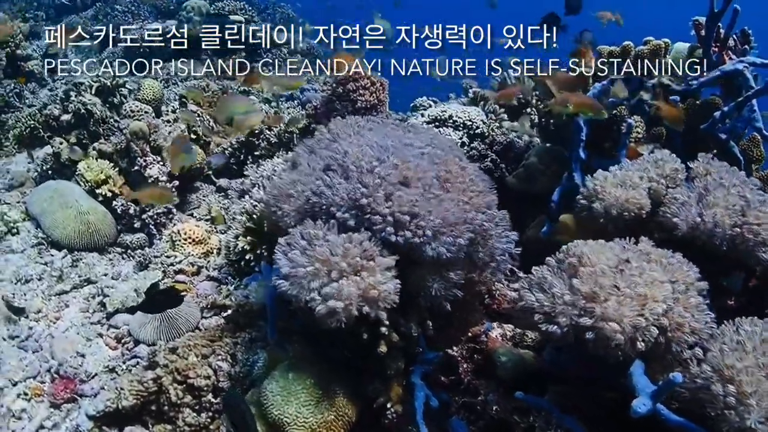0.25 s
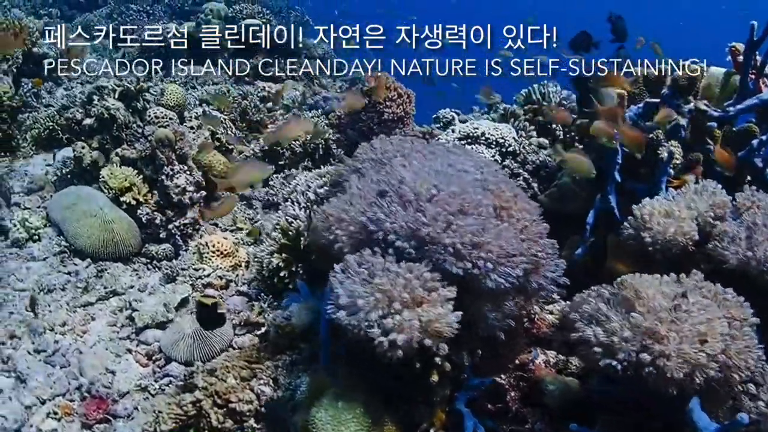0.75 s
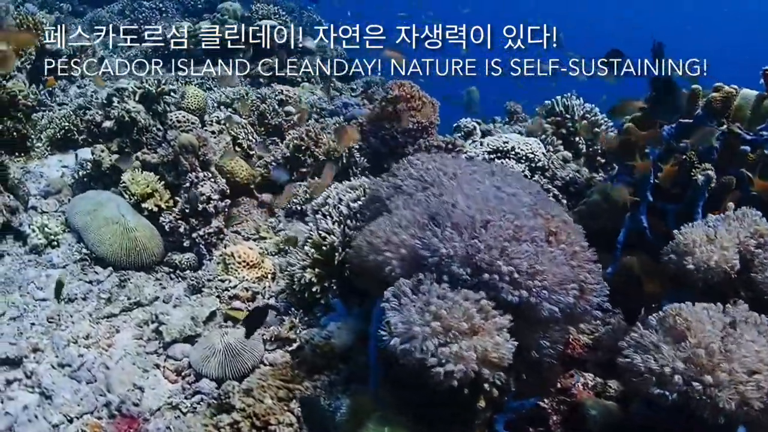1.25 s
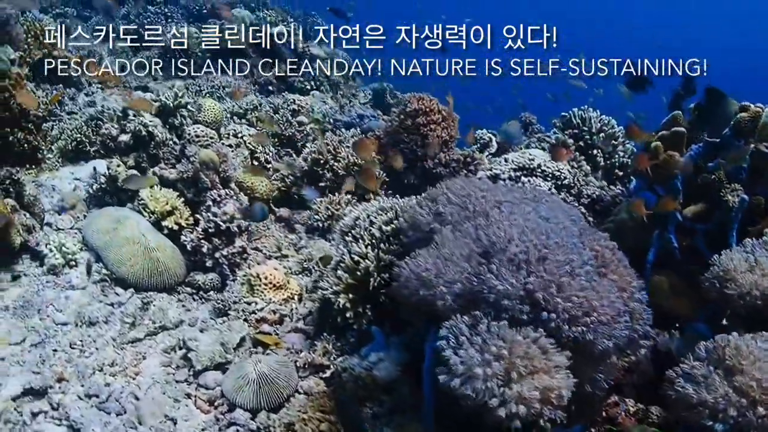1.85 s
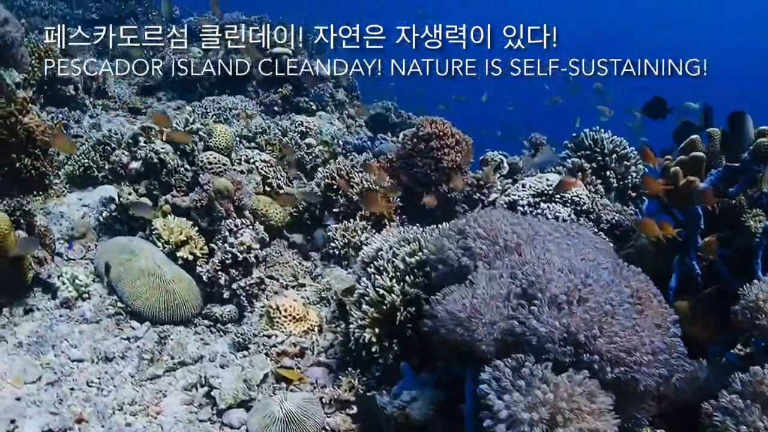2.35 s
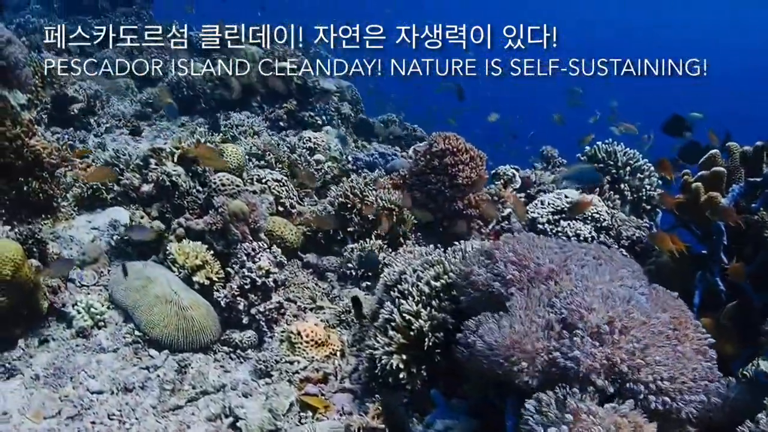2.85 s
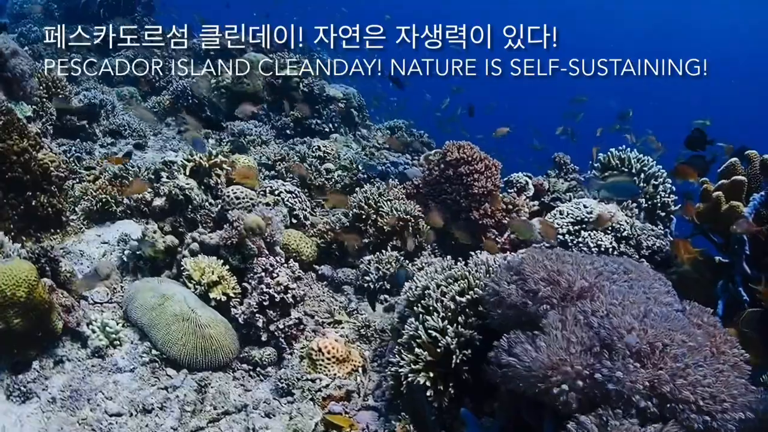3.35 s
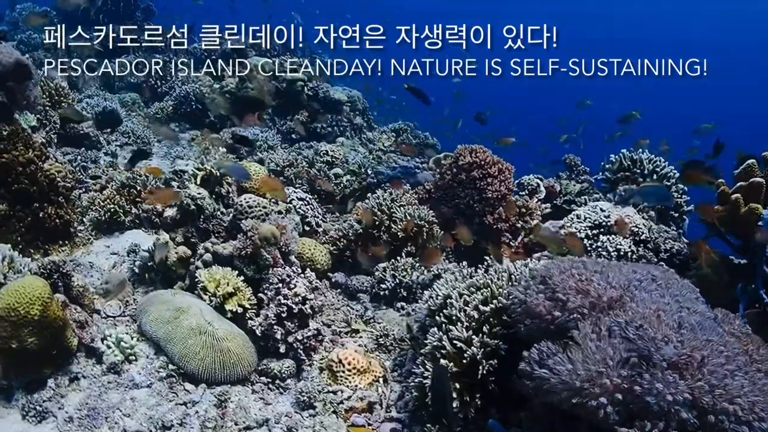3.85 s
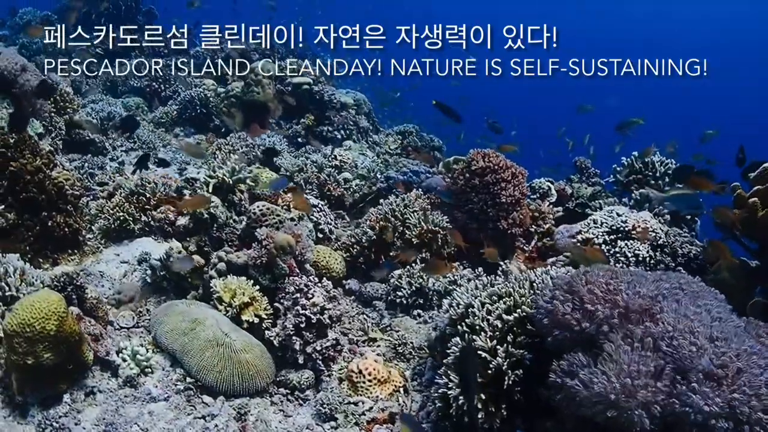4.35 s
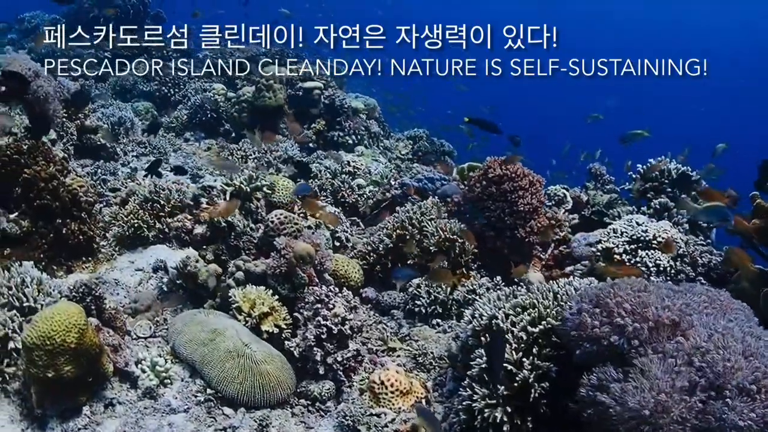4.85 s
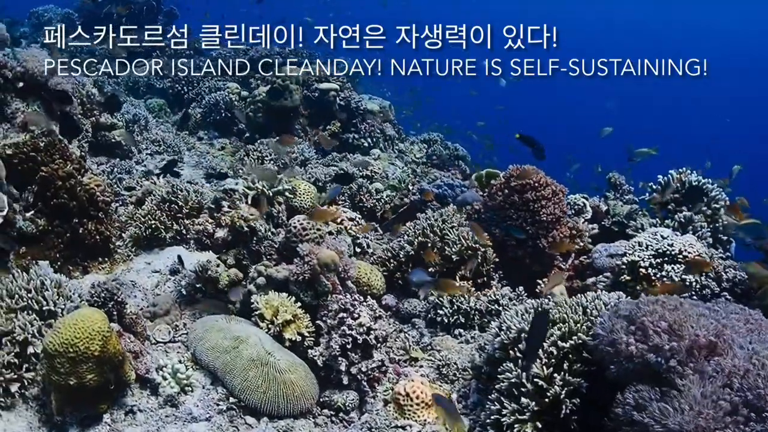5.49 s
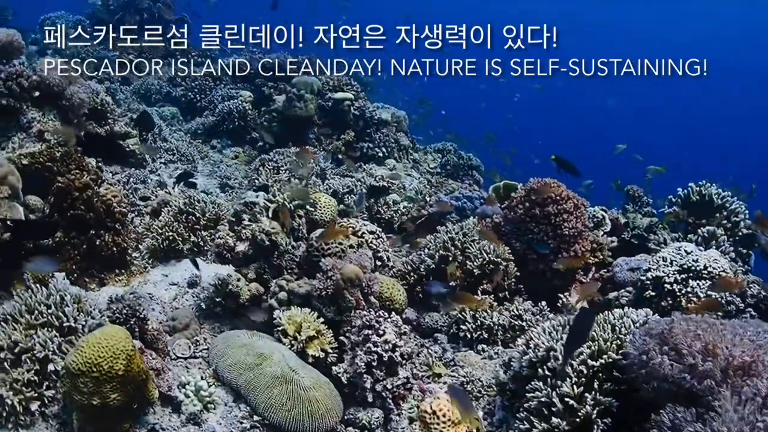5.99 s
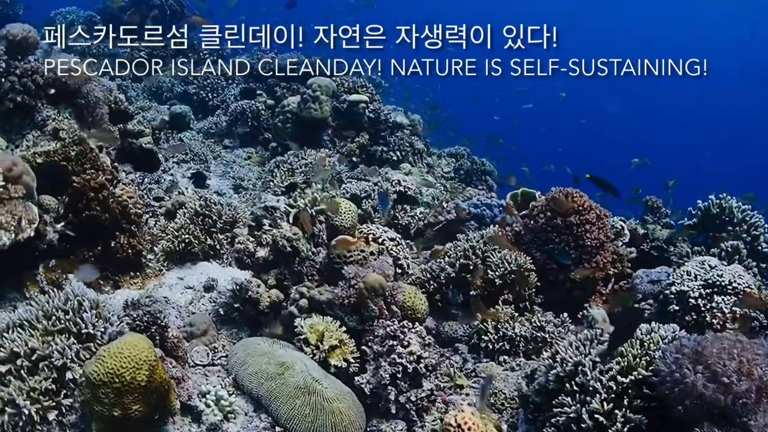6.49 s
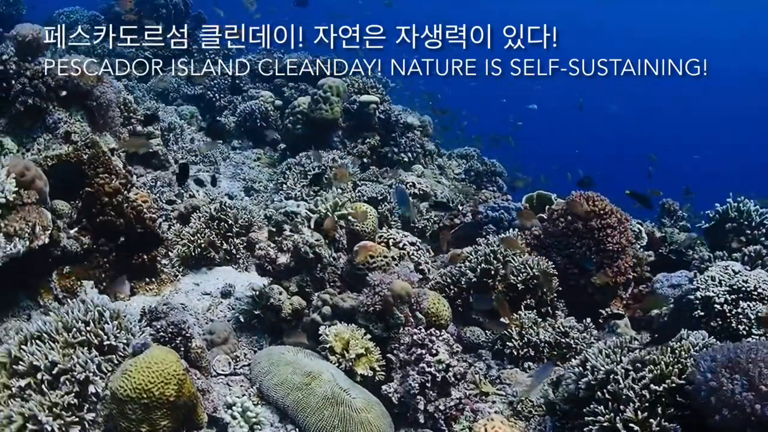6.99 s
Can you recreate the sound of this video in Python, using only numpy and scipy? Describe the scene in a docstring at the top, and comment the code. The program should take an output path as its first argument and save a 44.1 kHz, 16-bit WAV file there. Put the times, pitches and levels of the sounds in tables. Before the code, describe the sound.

Rising air tumbles past a muffled underwater stereo microphone: deep knocking bubbles around a boomy low pitch, plus quieter mid-pitched plops. The flow surges, thins and returns in bursts, gradually becoming sparser, with short climbing gurgles more frequent near the end. All around, distant shrimp make a dry fine sizzle, punctuated by small bright snaps; the strongest come before three seconds and at the close. Soft hiss stays steady.

```python
"""Rising air breaks into large and small bubbles on a reef, heard through a sealed camera housing.
Each bubble is a briefly ringing damped oscillator; in gurgles its pitch climbs as the bubble pinches off.
Shrimp snap all around: sharp broad cracks with a short high ring, over a dense far crackle.
The housing's walls and air colour bubbles and snaps before two microphone ports, each with faint hiss."""
import sys
import numpy as np
from scipy import signal
from scipy.fft import rfft, irfft, next_fast_len
from scipy.io import wavfile

SR = 44100
rng = np.random.default_rng(int(sys.argv[2]) if len(sys.argv) > 2 else 0)


def inscribe(sig):
    """Save sig as 16-bit PCM at rate SR to the path in sys.argv[1].

    A 1-D sig is mono; a 2-D sig holds one channel per row.
    Samples are clipped to [-1, 1] before scaling.
    """
    pcm = np.round(np.clip(np.atleast_2d(sig).T, -1, 1) * 32767)
    wavfile.write(sys.argv[1], SR, pcm.astype(np.int16))


N = 318843  # samples


def from_db(db):
    """Amplitude ratio: 20 dB is a factor of ten."""
    return 10 ** (np.asarray(db) / 20)


def rms_one(x):
    """Normalisation by mean power: the signal scaled to rms 1."""
    return x / np.sqrt(np.mean(x ** 2) + 1e-20)


def in_time(rows):
    """Linear interpolation: each column of a time curve at every sample."""
    s, *columns = np.transpose(rows)
    return [np.interp(np.arange(N) / SR, s, column) for column in columns]


def at_hz(points, hz):
    """Logarithmic frequency scale: a spectrum read between its points."""
    point_hz, value = np.array(points)[:, 0], np.array(points)[:, 1]
    return np.interp(np.log(hz + 1), np.log(point_hz + 1), value)


def surge(corner_hz):
    """Low-pass noise: a slow random swing of rms 1 that gathers loud bubbles and snaps in clusters."""
    r = np.exp(-2 * np.pi * corner_hz / SR)
    noise = rng.standard_normal(N + SR)
    slow = signal.lfilter([1], [1, -2 * r, r * r], noise)
    return rms_one(slow[SR:])  # the filter's first second of settling is dropped


def pulse_spectrum(f, hz, t60, onset_q, crack_db, rise_per_s):
    """Damped oscillation: a ring, possibly climbing, set going by a short push and marked by a broad crack."""
    size = round(SR / f[1])
    t = np.arange(min(size, SR // 2)) / SR
    decay = np.log(1000) / t60  # 60 dB down after t60
    phase = 2 * np.pi * hz * (t + rise_per_s * t ** 2 / 2)
    ring = rfft(2 * decay / SR * np.exp(-decay * t) * np.cos(phase), size)
    # the push is a resonant band-pass: a higher Q swells more slowly
    bandwidth = 1j * f * hz / onset_q
    push = bandwidth / (hz ** 2 - f ** 2 + bandwidth)
    # the crack is a click with its lows and highs rolled off
    high_pass = (1j * f / (.8 * hz + 1j * f)) ** 4
    low_pass = 1 / (1 + 1j * f / (1.1 * hz + 2200)) ** 4
    return ring * push + from_db(crack_db) * high_pass * low_pass


# broad transmission of the housing: frequency_hz [Hz], level_db [dB]
HOUSING_TRANSMISSION = [(25, -37), (60, -19), (120, -14.5), (230, -20.5), (330, -39.5), (450, -32),
                        (750, -35.5), (950, -51.5), (1250, -61.5), (1950, -65), (2600, -60.5), (4600, -46),
                        (5300, -57.5), (11000, -69)]
# its resonances, and a dip where negative: centre_hz [Hz], width_hz [Hz], level_db [dB]
HOUSING_RESONANCES = [(135.6, 26, 5), (188, 18.2, 13), (402, 35, 10), (587, 45.5, 9.5), (671.7, 20, 6.5),
                      (841, 33, 9.5), (1080, 100, 17.5), (2742, 314, 16), (3000, 286, 11.5),
                      (3354, 180, 10), (4195, 140, 8), (5040, 820, -7), (7400, 410, 1)]
# level difference of the ports: frequency_hz [Hz], left_minus_right_db [dB]
PORT_BALANCE_CURVE = [(200, 0), (400, -.7), (590, 1.5), (850, -.3), (2000, .5), (3000, 2.2), (4300, 5.5),
                      (6000, 1.5)]
# phase difference of the ports: frequency_hz [Hz], left_lead_rad [radians]
PORT_PHASE_CURVE = [(700, 0), (1030, .2), (1640, -.4), (2410, -1.5), (2670, .7), (3010, 2.0), (3360, 0),
                    (3960, -.5), (5080, 2.2)]


def housing(size):
    """Minimum-phase transmission: walls and enclosed air filter the sound on its way to each port."""
    f = np.arange(size // 2 + 1) * SR / size
    level_db = at_hz(HOUSING_TRANSMISSION, f)
    for hz, width, db in HOUSING_RESONANCES:
        level_db = level_db + db / (1 + (2 * (f - hz) / width) ** 2)
    cepstrum = irfft(np.log(from_db(level_db)), size)
    # folding the cepstrum onto positive lags makes the response causal
    cepstrum[1:size // 2] *= 2
    cepstrum[size // 2 + 1:] = 0
    # each port takes half of the level and phase difference
    half = from_db(at_hz(PORT_BALANCE_CURVE, f) / 2) * np.exp(.5j * at_hz(PORT_PHASE_CURVE, f))
    return f, np.exp(rfft(cepstrum)) * np.array([half, 1 / half])


# random level difference of each arrival between ports: frequency_hz [Hz], spread_db [dB re its amplitude]
PORT_SPREAD_CURVE = [(30, -18), (70, -26), (170, -38), (300, -18), (1100, -10), (3000, -2)]


def port_spread(hz):
    """Interaural-style level difference: the share by which an arrival may lean to one port."""
    return from_db(at_hz(PORT_SPREAD_CURVE, hz))


def crowd(level_db, low_hz, high_hz, per_s, cycles, uneven_db, onset_q, crack_db, count, rise_per_s=0):
    """Shot noise: pulses at random moments, sizes and `count` pitches, leaning at random to either port."""
    size = next_fast_len(N + SR // 2)
    f, ports = housing(size)
    mean_db = np.mean(level_db)
    born = rng.random(N) < per_s / SR
    excess = np.minimum(rng.exponential(1, N), 3.2)
    sizes = born * from_db(uneven_db * excess) * rng.choice([-1, 1], N)
    sizes = from_db(level_db - mean_db) * sizes
    tilt, dealt = rng.standard_normal(N), rng.integers(0, count, N)
    total = 0
    for k, hz in enumerate(np.geomspace(low_hz, high_hz, count)):
        side = port_spread(hz) * tilt
        clicks = sizes * (dealt == k) * np.array([1 + side, 1 - side])
        t60 = cycles / hz
        total = total + rfft(clicks, size) * pulse_spectrum(f, hz, t60, onset_q, crack_db, rise_per_s)
    heard = irfft(total * ports, size)[:, :N]
    return from_db(mean_db) * rms_one(heard)


SCATTER_S = 0.0043  # time for the echoes to fall to 1/e in amplitude


def singles(events, size, scatter_db):
    """Scattering: each pulse passes the housing, a little to one side, with echoes from nearby coral."""
    f, ports = housing(size)
    lead = size // 16  # room ahead for the port that hears it first
    out = np.zeros((2, N + size))
    chance = rng.standard_normal((len(events), size))
    echoes = from_db(scatter_db) * chance * np.exp(-np.arange(size) / (SCATTER_S * SR))
    echoes[:, 0] = 1  # direct sound
    for event, tilt, echo in zip(events, chance[:, 0], rfft(echoes)):
        s, peak_db, hz, t60, crack_db, onset_q, rise_per_s = event
        source = pulse_spectrum(f, hz, np.clip(t60, .002, .3), onset_q, crack_db, rise_per_s)
        pulse = irfft(ports * echo * source, size)
        pulse = np.roll(pulse, lead, axis=1) / np.abs(pulse).max()
        side = np.clip(port_spread(hz) * tilt / 2, -.5, .5)
        at = round(s * SR)
        out[:, at:at + size] += from_db(peak_db) * pulse * [[1 + side], [1 - side]]
    return out[:, lead:lead + N]


# spectrum shape of the microphone hiss: frequency_hz [Hz], relative_level_db [dB per Hz]
HISS_SPECTRUM = [(300, -19), (2300, -16.5), (4000, 1.5), (6000, -5.5), (11000, -6)]
HISS_DB = -70.5  # rms


def hiss():
    """Electronic noise: steady, independent shaped noise of each microphone's own electronics."""
    white = rfft(rng.standard_normal((2, N)))
    f = np.arange(N // 2 + 1) * SR / N
    shaped = irfft(white * from_db(at_hz(HISS_SPECTRUM, f)), N)
    return from_db(HISS_DB) * rms_one(shaped)


def far_shrimp():
    """Superposition: so many faint snaps overlap that they merge into a fine crackle."""
    level_db = -69 + 2.1 * surge(44.0)
    return crowd(level_db, low_hz=2450, high_hz=4820, per_s=22000, cycles=1.0, uneven_db=8.0,
                 onset_q=11.0, crack_db=-26.5, count=4)


# level of the near shrimp before its random swing: start_s [s], level_db [dB]
NEAR_CRACKLE = [(0.0, -65), (6.83, -71.5), (7.23, -60.5)]


def near_shrimp():
    """Random impulses: sparser snaps, each a crack with a ring of its own."""
    level_db = in_time(NEAR_CRACKLE)[0] + 2.8 * surge(16.0)
    return crowd(level_db, low_hz=2515, high_hz=7770, per_s=400, cycles=77.0, uneven_db=3.5,
                 onset_q=1.3, crack_db=-11, count=11)


# shrimp snaps that stand out; level is the peak before the lean to one port:
# start_s [s], level_db [dB], pitch_hz [Hz]
SNAP_EVENTS = [(0.0303, -48, 2740), (0.0917, -44.5, 4300), (0.35, -51.5, 2700), (0.3734, -48, 2970),
               (0.496, -40.5, 2900), (0.5257, -40, 4410), (0.6858, -46.5, 4070), (1.001, -45, 2700),
               (1.0385, -46, 4070), (1.06, -46.5, 4200), (1.2231, -49.5, 2870), (1.269, -49.5, 2820),
               (1.284, -43.5, 4230), (1.3848, -51, 2980), (1.4167, -47.5, 4300), (1.569, -47, 2750),
               (1.6914, -46.5, 2770), (1.82, -49, 3000), (1.8905, -43, 2940), (1.954, -44, 4020),
               (2.0243, -46.5, 2700), (2.149, -54, 2740), (2.2314, -50, 4370), (2.4553, -49.5, 2700),
               (2.575, -39.5, 2870), (2.647, -40, 2680), (2.657, -33, 2830), (2.905, -53, 4290),
               (3.0004, -45.5, 3260), (3.0455, -48.5, 3060), (3.1253, -45.5, 2900), (3.2201, -49, 3030),
               (3.2347, -40, 2960), (3.3016, -51.5, 2680), (3.479, -52, 3000), (3.6012, -45.5, 3120),
               (3.655, -47, 2900), (3.696, -49.5, 4200), (3.813, -48.5, 2680), (3.8921, -45, 3380),
               (4.2278, -48, 4350), (4.2697, -54.5, 2770), (4.3276, -53, 3050), (4.369, -43.5, 2830),
               (4.6106, -49, 3040), (4.7701, -50, 4320), (4.8414, -42.5, 4230), (4.9476, -47.5, 4270),
               (4.9972, -46.5, 3050), (5.0675, -37.5, 3080), (5.089, -47, 2910), (5.1407, -51, 4050),
               (5.1886, -55, 2960), (5.236, -49, 3000), (5.28, -51, 2730), (5.3144, -46.5, 2900),
               (5.3988, -37, 4480), (5.523, -45.5, 3430), (5.5617, -49.5, 2690), (5.614, -48.5, 2830),
               (5.813, -47.5, 2700), (5.845, -47, 2960), (6.0257, -49.5, 4020), (6.1195, -47.5, 4260),
               (6.1668, -44.5, 2720), (6.347, -51, 2700), (6.532, -42, 3900), (6.5655, -46.5, 3970),
               (6.6016, -49, 3000), (6.6395, -52, 2770), (6.748, -46.5, 2770), (6.7667, -43.5, 3000),
               (6.806, -48.5, 2920), (6.8882, -41, 3500), (6.9174, -45.5, 4400), (7.0038, -49.5, 3200),
               (7.0954, -43, 4040), (7.1155, -40, 2760), (7.1432, -36.5, 2830), (7.159, -32, 3120)]
SNAP_CYCLES, SNAP_ONSET_Q = 46, 2.2  # cycles to die by 60 dB, sharpness of the push
SNAP_CRACK_DB, SNAP_CRACK_SPREAD_DB = -8.5, 8.5


def standout_snaps():
    """Impulse excitation: some snaps are a broad crack, others mostly ring."""
    cracks_db = SNAP_CRACK_DB + SNAP_CRACK_SPREAD_DB * rng.standard_normal(len(SNAP_EVENTS))
    events = []
    for (s, db, hz), crack_db in zip(SNAP_EVENTS, cracks_db):
        events.append((s, db, hz, SNAP_CYCLES / hz, crack_db, SNAP_ONSET_Q, 0))
    return singles(events, size=4096, scatter_db=-11.0)


# bubble crowd, fading unevenly as the air rises away; levels before the random swing:
# start_s [s], large_level_db [dB], small_level_db [dB]
AIR_FLOW = [(0.0, -39.5, -48), (0.3, -39.5, -59), (1.9, -42, -51.5), (2.2, -41.5, -59.5),
            (3.7, -42.5, -55.5), (4.0, -44, -57), (4.5, -42.5, -61), (4.77, -41.5, -53.5), (5.03, -45, -62),
            (5.35, -40.5, -57.5), (5.8, -49, -61), (6.5, -44, -58.5), (7.23, -44.5, -58)]


def bubble_crowd():
    """Volume resonance: larger bubbles ring lower; all three sizes swell together in one surge."""
    swing = surge(11.0)
    large_db, small_db = in_time(AIR_FLOW)
    large_db = large_db + 3.0 * swing
    small_db = small_db + 2.2 * swing
    tiny_db = small_db - 35
    large = crowd(large_db, low_hz=29.2, high_hz=292.2, per_s=160, cycles=4.73, uneven_db=0.5,
                  onset_q=0.86, crack_db=-18.5, count=10)
    small = crowd(small_db, low_hz=336.2, high_hz=1218.0, per_s=900, cycles=29.7, uneven_db=5.5,
                  onset_q=4.5, crack_db=-41.0, count=16, rise_per_s=2.3)
    tiny = crowd(tiny_db, low_hz=1300, high_hz=2250, per_s=22, cycles=30.0, uneven_db=3.0,
                 onset_q=5.0, crack_db=-50, count=8)
    return large + small + tiny


# in both tables level is the peak before the lean to one port, and t60 is held to 0.3 s at most
# single bubbles that stand out: start_s [s], level_db [dB], pitch_hz [Hz], ring_t60_s [s]
BUBBLE_EVENTS = [(0.127, -31.5, 128, 0.17), (0.319, -56.5, 1480, 0.016), (0.328, -31, 157.5, 0.1),
                 (0.413, -30.5, 169, 0.02), (0.708, -26, 131, 0.037), (0.755, -34, 174, 0.044),
                 (0.757, -71, 2020, 0.052), (0.897, -28.5, 197, 0.032), (0.95, -35.5, 580, 0.041),
                 (1.095, -32.5, 228, 0.044), (1.097, -45, 407, 0.031), (1.173, -62, 1440, 0.05),
                 (1.217, -26, 161, 0.024), (1.241, -28, 172, 0.1), (1.262, -34.5, 178, 0.1),
                 (1.28, -36, 540, 0.0084), (1.313, -29.5, 146.7, 0.17), (1.469, -38, 379, 0.038),
                 (1.52, -54, 1080, 0.063), (1.563, -35.5, 191, 0.08), (1.634, -43, 646, 0.42),
                 (1.75, -42, 1030, 0.019), (1.825, -47.5, 1010, 0.04), (1.871, -36, 437, 0.072),
                 (1.901, -34.5, 138, 0.11), (2.014, -36.5, 484, 0.042), (2.024, -32, 183.2, 0.15),
                 (2.125, -32, 130, 0.02), (2.219, -28.5, 155, 0.026), (2.244, -27.5, 170, 0.033),
                 (2.374, -35.5, 189.6, 0.41), (2.446, -51.5, 1122, 0.13), (2.594, -34, 587, 0.033),
                 (2.706, -33.5, 587, 0.021), (2.718, -35, 600, 0.06), (2.792, -30, 179, 0.12),
                 (2.806, -43.5, 550, 0.035), (2.96, -34, 203, 0.026), (3.06, -25.5, 173, 0.13),
                 (3.237, -42.5, 732, 0.056), (3.265, -27, 122, 0.006), (3.322, -54.5, 1110, 0.034),
                 (3.435, -33.5, 191, 0.38), (3.68, -43, 586, 0.047), (3.75, -43, 554, 0.04),
                 (3.887, -37, 206, 0.039), (4.06, -40.5, 196, 0.081), (4.08, -21.5, 188, 0.052),
                 (4.181, -73, 1550, 0.039), (4.186, -36, 190, 0.055), (4.205, -30, 192, 0.2),
                 (4.233, -38, 587, 0.0079), (4.343, -30, 128, 0.033), (4.533, -35, 185.5, 0.12),
                 (4.601, -27, 201, 0.035), (4.618, -45.5, 580, 0.033), (4.711, -27.5, 183, 0.06),
                 (4.743, -46, 550, 0.096), (4.765, -31.5, 188, 0.42), (4.857, -42.5, 415, 0.038),
                 (4.936, -43.5, 850, 0.026), (5.055, -33.5, 177, 0.11), (5.236, -47.5, 607, 0.072),
                 (5.295, -44, 585, 0.047), (5.302, -29.5, 182.5, 0.066), (5.338, -52.5, 1116, 0.04),
                 (5.343, -29, 184.4, 0.1), (5.348, -46.5, 652, 0.072), (5.376, -24.5, 203.2, 0.24),
                 (5.432, -28, 686, 0.12), (5.594, -26.5, 182, 0.0083), (5.636, -31.5, 206, 0.07),
                 (5.768, -47.5, 532, 0.38), (5.858, -31, 187, 0.0094), (5.876, -44.5, 1012, 0.022),
                 (5.965, -54.5, 855, 0.078), (6.072, -32, 188, 0.055), (6.179, -21, 160, 0.044),
                 (6.274, -29.5, 188, 0.049), (6.35, -28.5, 164.8, 0.36), (6.389, -29, 406, 0.035),
                 (6.586, -30.5, 189, 0.095), (6.64, -65, 2050, 0.049), (6.708, -35, 198.5, 0.34),
                 (6.912, -23.5, 163, 0.11), (6.998, -61, 1400, 0.052), (7.08, -27.5, 162, 0.01),
                 (7.086, -32, 375, 0.017)]
# gurgles, whose pitch climbs: start_s [s], level_db [dB], start_pitch_hz [Hz], ring_t60_s [s]
GURGLE_EVENTS = [(0.363, -45, 439, 0.11), (3.293, -43, 409, .1), (4.151, -41, 710, 0.087),
                 (5.694, -50, 514, 0.3), (6.357, -43.5, 441, 0.28), (6.496, -40, 494, 0.098),
                 (6.711, -38.5, 429, 0.11), (6.856, -45.5, 530, .15)]
GURGLE_RISE_PER_S = 7.3  # share of the starting pitch gained each second
LARGE_BELOW_HZ = 300
LARGE_ONSET = (-25, 0.42)  # crack dB, sharpness Q of the push
SMALL_ONSET = (-44.5, 3.0)


def standout_bubbles():
    """Transient of a resonator: large bubbles start abruptly with a crack, small ones swell over cycles."""
    events = []
    for s, db, hz, t60 in BUBBLE_EVENTS:
        onset = LARGE_ONSET if hz < LARGE_BELOW_HZ else SMALL_ONSET
        events.append((s, db, hz, t60, *onset, 0))
    for row in GURGLE_EVENTS:
        events.append((*row, *SMALL_ONSET, GURGLE_RISE_PER_S))
    return singles(events, size=16384, scatter_db=-26.0)


def scene():
    """Linear superposition: hiss, shrimp and bubbles add at the two ports."""
    shrimp = far_shrimp() + near_shrimp() + standout_snaps()
    bubbles = bubble_crowd() + standout_bubbles()
    return hiss() + shrimp + bubbles


OVERLOAD, CUTOFF_HZ = .088, 11050  # clipping amplitude, start of the stop band


def record(dry):
    """Overload and band limiting: the highest peaks are clipped, then the top is cut."""
    flattened = np.clip(dry, -OVERLOAD, OVERLOAD)
    low_pass = signal.cheby2(20, 50, CUTOFF_HZ, fs=SR, output="sos")
    return signal.sosfilt(low_pass, flattened)


dry = scene()
out = record(dry)
inscribe(out)
```